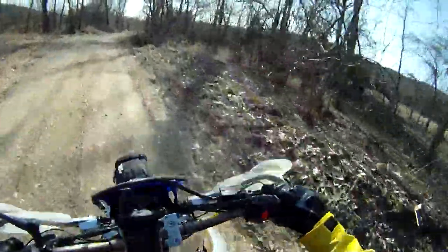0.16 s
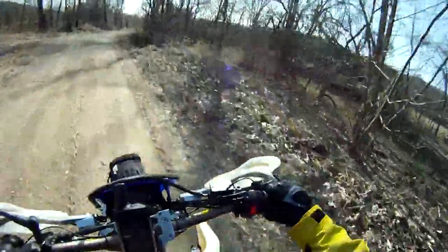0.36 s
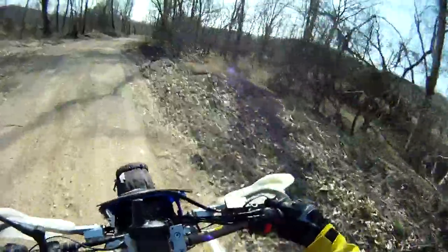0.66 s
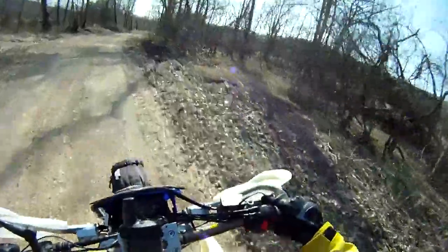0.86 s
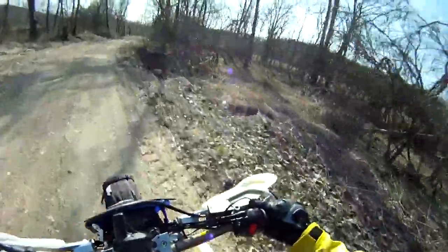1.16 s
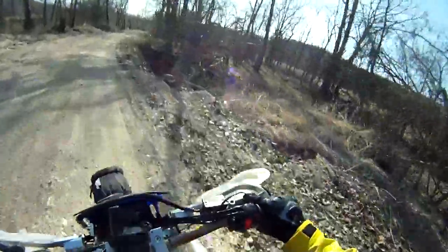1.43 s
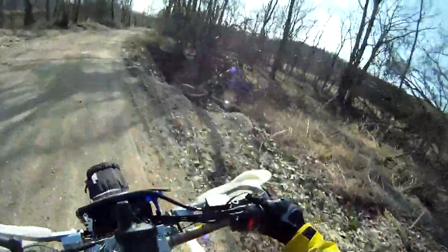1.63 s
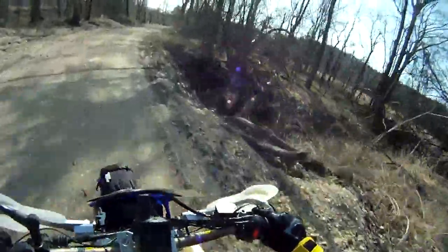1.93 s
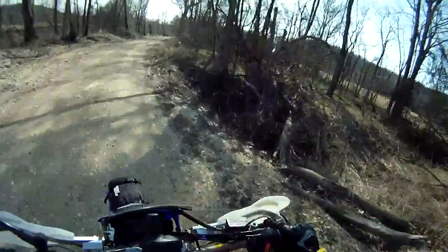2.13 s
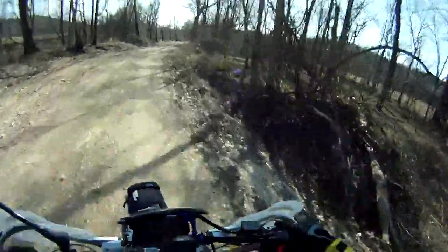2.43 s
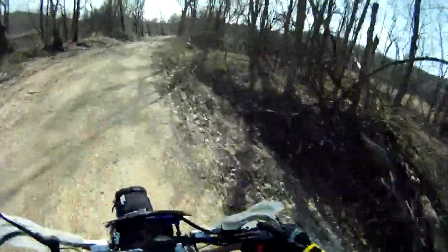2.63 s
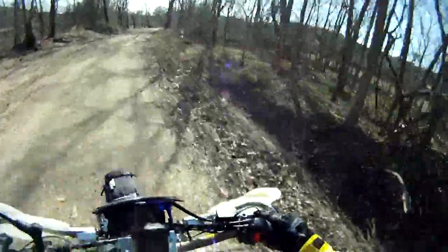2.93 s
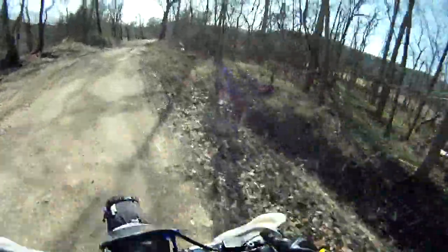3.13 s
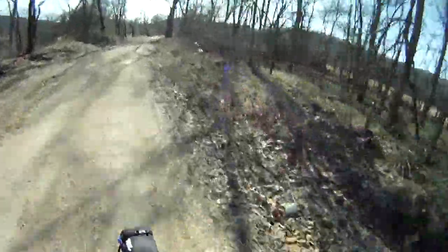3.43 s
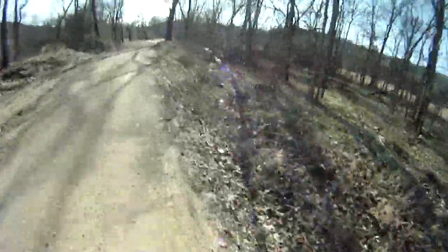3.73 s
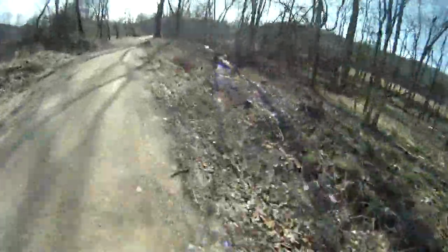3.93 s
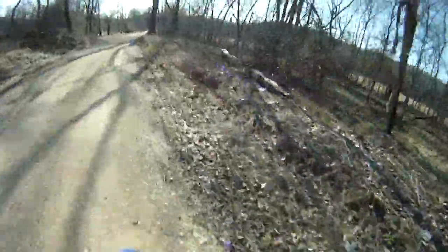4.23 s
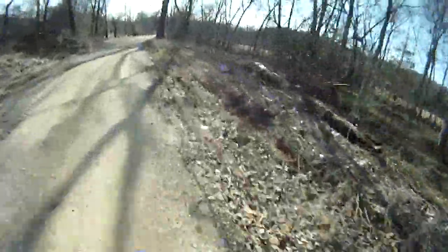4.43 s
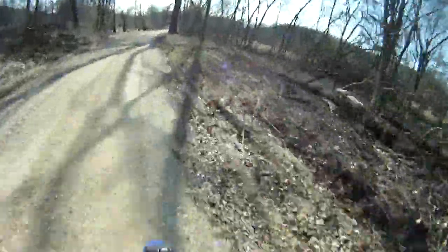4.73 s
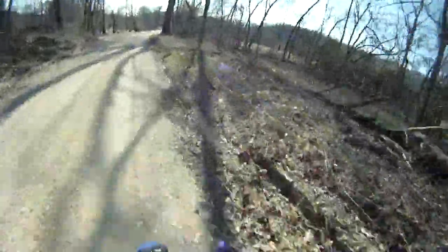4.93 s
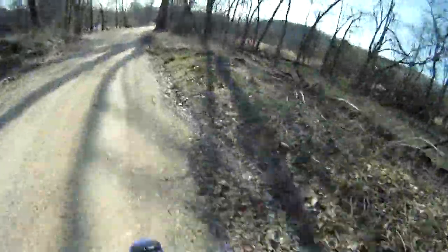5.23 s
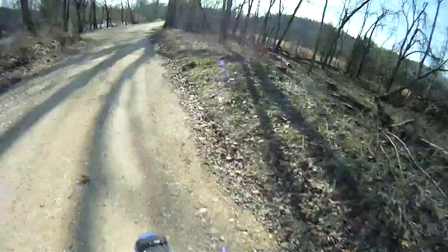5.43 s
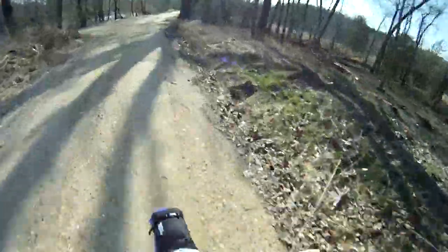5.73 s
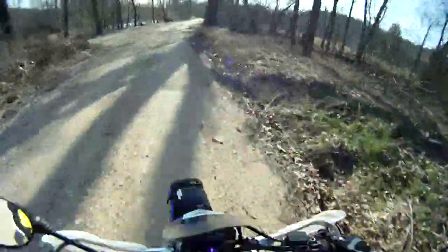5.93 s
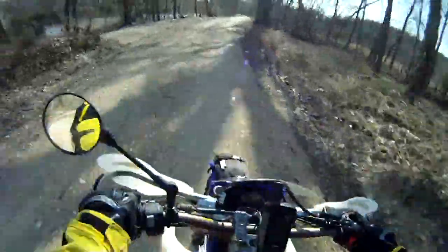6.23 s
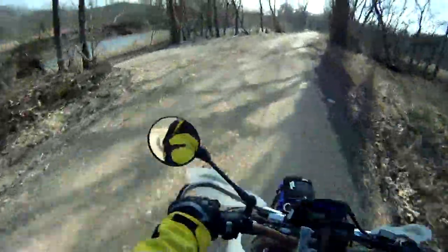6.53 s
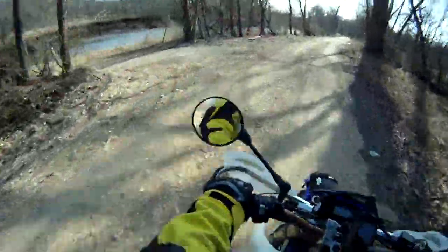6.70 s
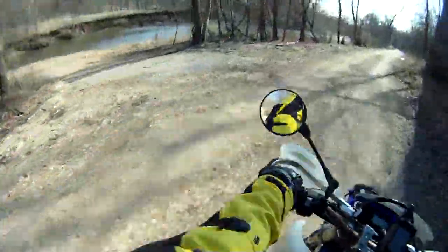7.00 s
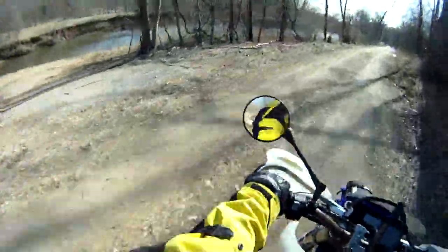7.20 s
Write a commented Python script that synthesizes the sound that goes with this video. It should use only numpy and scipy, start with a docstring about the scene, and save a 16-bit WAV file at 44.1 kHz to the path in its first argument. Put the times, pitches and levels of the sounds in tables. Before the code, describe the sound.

Thumping, ringing dirt bike engine revs up, drops for a gear change, revs again and coasts down amid hissing, moaning wind and late jolts.

```python
"""A dirt bike's single-cylinder engine pulls through a gear change on a dirt road, in a helmet camera's closed case.
Shaft-locked sines through resonances thump; firing pulses bark in the pipe and ring the case.
Patterned noise makes the valve rattle, sines the gear whine; shaped noise makes the hissing, moaning, buffeting wind.
Short noise bursts jolt the mount. The camera holds each sample at a low rate, so the treble mirrors the low sound."""
import sys
import numpy as np
from scipy import signal
from scipy.fft import rfft, irfft, next_fast_len
from scipy.io import wavfile
from scipy.ndimage import map_coordinates

SR = 44100
rng = np.random.default_rng(int(sys.argv[2]) if len(sys.argv) > 2 else 0)


def int16_out(signal):
    """Quantize to a 16-bit WAV file."""
    q = np.round(np.clip(np.atleast_2d(signal).T, -1, 1) * 32767)
    wavfile.write(sys.argv[1], SR, q.astype(np.int16))


def invert_db(level):
    """Linear amplitude ratio for a level in decibels (20 dB per decade), elementwise."""
    return 10 ** (np.asarray(level, dtype=float) / 20)


N = 324576

# case resonances: (frequency [Hz], width [Hz], level [dB])
CASE_MODES = [(1130, 75, -2), (1195, 75, 0)]


def unit(x):
    """Scales to rms 1."""
    return x / np.sqrt(np.mean(x ** 2) + 1e-20)


def curves(rows):
    """One value per sample for each column after the time."""
    time_s, *columns = np.transpose(rows)
    return [np.interp(np.arange(N) / SR, time_s, column) for column in columns]


def wobble(rate_hz):
    """A smooth random curve through rate_hz normal knots a second."""
    knots = rng.standard_normal(int(N * rate_hz / SR) + 4)
    return map_coordinates(knots, [np.arange(N) * rate_hz / SR])


def filtered(x, response):
    """Applies a complex response of frequency."""
    size = next_fast_len(N + SR // 2)
    return irfft(rfft(x, size) * response(np.fft.rfftfreq(size, 1 / SR)), size)[:N]


def modes(table):
    """Causal response of parallel resonances of alternating sign."""
    def response(f):
        total = 0
        for k, (hz, width_hz, db) in enumerate(table):
            resonance = 1j * f * width_hz / (hz * hz - f * f + 1j * f * width_hz)
            total = total + (-1) ** k * invert_db(db) * resonance
        return total
    return response


def band_noise(hz, width_hz):
    """Noise through two equal resonances in series, at rms 1."""
    return unit(filtered(rng.standard_normal(N), lambda f: modes([(hz, width_hz, 0)])(f) ** 2))


def pulses(cycle, scatter_db, jitter_s):
    """One impulse per whole firing cycle, uneven in size and timing; odd firings stand out."""
    # firings hard or nearly missed: (time [s], level re usual [dB])
    odd_firings = [(3.088, 3.5), (3.169, 0.5), (3.635, 3), (3.894, 4), (4.004, 3.5), (4.64, -10),
                   (4.81, -7), (4.85, 4), (4.91, -12), (4.93, -5), (4.965, 1), (4.993, -5), (5.01, -2),
                   (5.654, 6.5), (5.716, 8), (5.918, 7.5), (5.982, 6), (6.044, 1), (6.059, -5), (6.074, 7)]
    at = np.flatnonzero(np.diff(np.floor(cycle))) + 1
    draw = rng.standard_normal((len(at), 2))
    size_db = scatter_db[at] * draw[:, 1]
    for time_s, db in odd_firings:
        size_db[np.argmin(np.abs(at / SR - time_s))] = db
    at = np.clip(at + np.round(jitter_s * SR * draw[:, 0]).astype(int), 0, N - 1)
    return np.bincount(at, invert_db(size_db), N)


def puffs(train, life_s):
    """A swell and decay of noise after every impulse."""
    t = np.arange(SR // 20) / SR / life_s
    return signal.fftconvolve(train, t * np.exp(-t))[:N] * rng.standard_normal(N)


def orders(cycle, table, waver_db):
    """Sines on multiples of the firing rate, each wavering slowly in level."""
    total = np.zeros(N)
    for multiple, db in table:
        level = invert_db(db + waver_db * wobble(5.7))
        total += level * np.sin(2 * np.pi * (round(multiple) * cycle + rng.random()))
    return total


def case_dip(f):
    """The closed case swallows a band."""
    # (frequency [Hz], width [Hz], share removed)
    hz, width_hz, share = (1750, 610, 0.87)
    return 1 - share * modes([(hz, width_hz, 0)])(f)


def pipe(cycle, fire, uneven_db, thump_db, bark_db):
    """Shaft-locked sines thump, firing pulses bark and gas noise puffs through pipe resonances."""
    # pipe orders: (multiple of firing rate, level [dB])
    pipe_orders = [(3, -14), (4, 0), (5, -3), (6, -4), (7, -7), (8, -7), (9, -11), (10, -9)]
    # resonances: (frequency [Hz], width [Hz], level [dB])
    thump_modes = [(93.5, 20, -5.5), (241, 77, 2), (312, 64, 3), (520, 26, 9.5)]
    bark_modes = [(519, 14, 0.5), (636, 25, 6), (723, 6.7, 1.5), (904, 37, 5), (1430, 114, -5.5)]
    steady = pulses(cycle, scatter_db=uneven_db / 2, jitter_s=.00003)
    drone = orders(cycle, pipe_orders, waver_db=1.5)
    thump = unit(filtered(drone, lambda f: .5 + np.abs(modes(thump_modes)(f))))
    bark = unit(filtered(steady, lambda f: modes(bark_modes)(f) * f ** 2 / (f ** 2 + 450 ** 2)))
    gas = unit(filtered(puffs(fire, life_s=.0062), modes(bark_modes)))
    return invert_db(thump_db) * thump + invert_db(bark_db) * (bark + .15 * gas)


def case_ring(fire):
    """Firings drive the case through its springy mount, so the ring swells for a few ms, then dies."""
    def swell(f):
        return modes(CASE_MODES)(f) * modes([(1165, 170, 0)])(f) ** 2
    clean = unit(filtered(fire, swell))
    ragged = unit(filtered(puffs(fire, life_s=.0035), swell))
    return unit(clean + .18 * ragged)


def valve_rattle(cycle, fire):
    """Valves, chain and gears make alike contacts at the same crank angles every cycle."""
    # resonances: (frequency [Hz], width [Hz], level [dB])
    rattle_modes = [(2333, 73, 1), (2620, 90, -7), (2948, 88, -6), (3337, 64, -6), (3536, 52, -7.5),
                    (3913, 70, -10), (5170, 280, -16)]
    angle = cycle % 1
    # the pattern drifts into a new one every 8 cycles
    patterns = rng.standard_normal((int(cycle[-1]) // 8 + 2, 256))
    contacts = map_coordinates(patterns, [cycle / 8, 255 * angle]) * (.6 + np.exp(-4 * angle))
    clatter = unit(puffs(fire, life_s=.0085)) + 2.1 * rng.standard_normal(N)
    mix = unit(contacts) * invert_db(1.2 * wobble(40)) + .2 * unit(clatter)
    return unit(filtered(mix, modes(rattle_modes)))


def crank_shake(cycle, thump_growth_db):
    """The crank's turn shakes the frame at one and two times the firing rate."""
    first = orders(cycle, [(1, -43)], waver_db=2.5)
    second = orders(cycle, [(2, -45)], waver_db=1.5)
    return first + invert_db(thump_growth_db / 2) * second


def gear_whine(cycle, shut):
    """Gear whine swells across the case ring; unloaded gears sing out with the throttle shut."""
    # levels ahead of the case's boost: (multiple of firing rate, level [dB])
    driven_orders = [(8, -53), (16, -52), (19, -57), (20, -51), (23, -57), (40, -58), (43, -57), (72, -60),
                     (73, -56)]
    coast_orders = [(2, -43), (3, -47), (16, -43), (19, -50), (20, -44)]
    driven = orders(cycle, driven_orders, waver_db=2.5)
    coast = orders(cycle, coast_orders, waver_db=1)
    driven = filtered(driven, lambda f: 1 + 2.5 * np.abs(modes(CASE_MODES)(f)))
    coast = filtered(coast, lambda f: 1 + np.abs(modes(CASE_MODES)(f)))
    return driven + shut * coast


def engine():
    """Firings sound through pipe and case over rattle, crank shake and whine, less the case's dip."""
    # (time [s], firing rate [Hz])
    rev_rows = [(0.0, 41.6), (0.45, 42.9), (0.75, 44.4), (1.05, 45.0), (1.2, 46.4), (1.65, 54.1),
                (1.95, 58.4), (2.1, 61.4), (2.25, 63.6), (2.46, 69.4), (2.52, 68.2), (2.9, 48.6),
                (3.15, 49.6), (3.75, 53.8), (4.15, 56.3), (4.55, 59.1), (4.75, 59.8), (5.15, 61.8),
                (5.55, 63.3), (6.12, 64.8), (6.25, 58.4), (6.4, 59.4), (7.0, 55.4), (7.36, 52)]
    # (time [s], case ring [dB], pipe bark [dB], rattle [dB])
    load_rows = [(0.0, -33.5, -40.5, -45.5), (1.1, -31, -37, -39.5), (1.72, -21, -34, -31.5),
                 (1.82, -21, -38, -30.5), (1.9, -26, -39, -30.5), (2.05, -29.5, -38, -31),
                 (2.09, -17.5, -28, -27), (2.27, -18.5, -28.5, -28), (2.36, -15, -28.5, -25.5),
                 (2.5, -20, -26, -30), (2.56, -30, -35, -30), (2.66, -44, -40.5, -32),
                 (2.76, -26, -42, -31), (2.83, -34, -44, -38), (2.95, -29.5, -34, -36),
                 (3.4, -25, -33.5, -36.5), (3.69, -22, -47, -33), (3.9, -20.5, -42, -35),
                 (3.97, -24.5, -38, -34.5), (4.6, -25, -43.5, -35), (5.2, -26.5, -34.5, -33),
                 (6.08, -27.5, -35, -34.5), (6.13, -35, -37, -34.5), (6.65, -42, -56, -29),
                 (6.95, -50, -43, -35.5), (7.36, -52, -42, -36)]
    # uneven as the second gear runs out: (time [s], scatter of firing size [dB])
    uneven_rows = [(0, 1.6), (4.2, 1.6), (4.7, 2.4), (6.1, 2.6), (6.2, 1.6), (7.36, 1.6)]
    revs_hz, uneven_db = curves(rev_rows)[0], curves(uneven_rows)[0]
    ring_db, bark_db, rattle_db = curves(load_rows)
    start_turn = .57  # share of a firing cycle already turned
    cycle = start_turn + np.cumsum(revs_hz) / SR
    shut_s, shut_swell_s, shut_loss_db = 6.12, .15, 2.5
    shut = np.clip((np.arange(N) / SR - shut_s) / shut_swell_s, 0, 1)
    thump_growth_db = .3 * (revs_hz - 55)
    thump_db = -40 + thump_growth_db - shut_loss_db * shut
    fire = pulses(cycle, scatter_db=uneven_db, jitter_s=.00004)
    total = pipe(cycle, fire, uneven_db, thump_db, bark_db)
    total += invert_db(ring_db) * case_ring(fire)
    total += invert_db(rattle_db) * valve_rattle(cycle, fire)
    total += crank_shake(cycle, thump_growth_db)
    total += gear_whine(cycle, shut)
    return filtered(total, case_dip)


def wind_hiss(hiss_db):
    """Rushing air hisses broadly and through the hollow of the case, which follows only in part."""
    # spectrum: (frequency [Hz], level per Hz [dB])
    hz, db = np.transpose([(88, -40), (150, -9), (231, -10), (300, -14), (724, -2.5), (1050, -2),
                           (1170, 0.5), (1910, -7), (2450, -1.5), (5220, -14.5), (6000, -27), (7800, -64),
                           (13200, -120)])
    # resonances: (frequency [Hz], width [Hz], level [dB])
    hollow_modes = [(600, 65, -5.5), (773, 170, -6.5), (934, 41, -3.5), (1170, 79, 1.5), (2326, 220, -0.5),
                    (2870, 410, -3.5)]

    def spectrum(f):
        return invert_db(np.interp(np.log(f + 1), np.log(hz), db, left=-60, right=-60))
    broad = unit(filtered(rng.standard_normal(N), spectrum))
    hollow = unit(filtered(rng.standard_normal(N), lambda f: modes(hollow_modes)(f) * case_dip(f)))
    hollow_db = -37.5 + .83 * (hiss_db + 34.5)
    return invert_db(1.14 * wobble(8)) * (invert_db(hiss_db) * broad + invert_db(hollow_db) * hollow)


def wind_buffet():
    """Eddies shed at two loosely kept paces throb over a low rumble."""
    # bands of noise: (frequency [Hz], width of each of two passes [Hz], level [dB])
    throb_bands = [(27, 13, 0), (63, 20, -11)]
    throb = unit(sum(invert_db(db) * band_noise(hz, width_hz) for hz, width_hz, db in throb_bands))
    rumble = unit(filtered(rng.standard_normal(N), modes([(99, 98, 0)])))
    return throb + .29 * rumble


def wind():
    """Air hisses past the case, moans across an edge and buffets, with random gusts."""
    # (time [s], buffet [dB], hiss [dB], moan [dB])
    wind_rows = [(0.0, -43.5, -40, -47), (1.2, -42, -37.5, -53), (1.8, -41.5, -34.5, -50),
                 (2.3, -39, -31, -62), (2.85, -41, -36.5, -42.5), (3.05, -32.5, -35, -45),
                 (3.6, -38.5, -34.5, -35.5), (4.2, -32.5, -33.5, -36), (4.5, -31.5, -32.5, -31.5),
                 (4.9, -32, -31, -31), (5.1, -31.5, -32.5, -38), (5.6, -33.5, -31.5, -33.5),
                 (6.05, -34, -28, -35), (6.2, -39.5, -31, -33.5), (6.75, -30.5, -30, -42),
                 (7.05, -27.5, -30.5, -36), (7.36, -28.5, -33, -43)]
    buffet_db, hiss_db, moan_db = curves(wind_rows)
    gust_buffet_db, gust_moan_db = 1.5, 2.5
    moan = invert_db(moan_db + gust_moan_db * wobble(7)) * band_noise(740, 130)
    buffet = invert_db(buffet_db + gust_buffet_db * wobble(5.5)) * wind_buffet()
    return wind_hiss(hiss_db) + moan + buffet


def bumps():
    """Each jolt is a short burst of gritty noise through the mount's resonances."""
    # (time [s], level of swell, which peaks at 1/e of it [dB], three times the rise to peak [s])
    jolts = [(7.006, -17.5, 0.052), (7.057, -20, 0.01), (7.06, -16.5, .03), (7.247, -15.5, 0.016),
             (7.256, -9, 0.024), (7.284, -17.5, 0.028)]
    # resonances: (frequency [Hz], width [Hz], level [dB])
    mount_modes = [(510, 110, -3), (780, 114, 0.5), (1235, 150, 1.5), (2350, 230, 2.5)]
    t, shake = np.arange(N) / SR, np.zeros(N)
    for time_s, db, length_s in jolts:
        u = 3 * np.clip((t - time_s) / length_s, 0, None)
        shake += invert_db(db) * u * np.exp(-u)
    grit = rng.standard_normal(N) * invert_db(2.8 * wobble(250))
    grit = filtered(grit, lambda f: modes(mount_modes)(f) / (1 + (f / 2600) ** 6))
    return shake * unit(grit)


def treble_hiss():
    """Steady hiss: white noise through a high-pass."""
    white_db, onset_hz = -38, 3500
    noise = rng.standard_normal(N)
    return invert_db(white_db) * filtered(noise, lambda f: f ** 2 / (f ** 2 + onset_hz ** 2))


def scene():
    """Engine, wind and jolts at one microphone, over a steady treble hiss."""
    return (engine() + wind() + bumps() + treble_hiss())[None]


def low_pass(x):
    """Removes everything above the highest recorded frequency."""
    return signal.sosfilt(signal.butter(12, 15640, fs=SR, output="sos"), x)


def record(dry):
    """Low-rate sampling mirrors the sound around that rate; the hold tilts it and notches the rate."""
    hold_hz, top_hz = 12000, 15400
    kept = filtered(dry[0], lambda f: 1 / (1 + (f / 5700) ** 12))
    mirrored = kept * (1 + 2 * np.cos(2 * np.pi * hold_hz * np.arange(N) / SR))
    held = filtered(mirrored, lambda f: np.sinc(f / hold_hz) * (f < top_hz))
    return low_pass(held[None])


dry = scene()
out = record(dry)
int16_out(out)
```